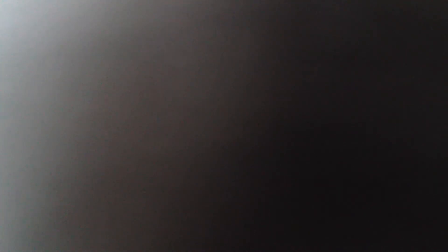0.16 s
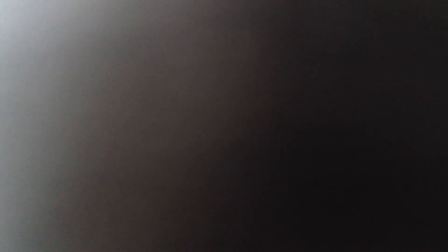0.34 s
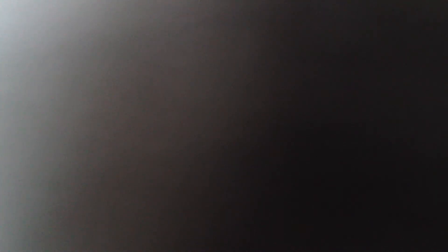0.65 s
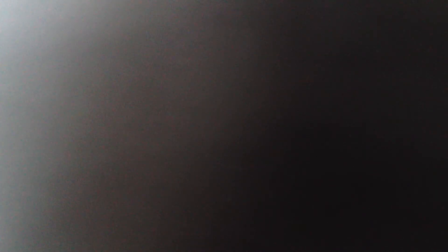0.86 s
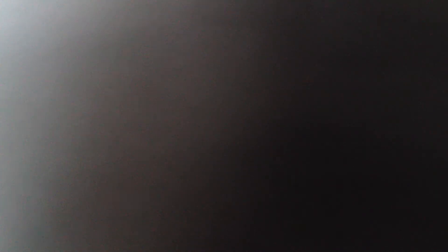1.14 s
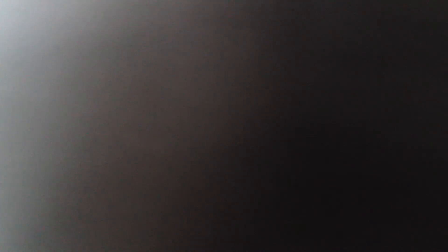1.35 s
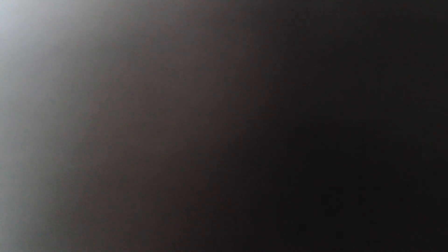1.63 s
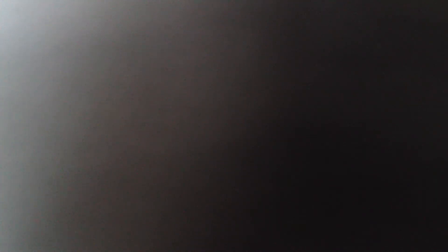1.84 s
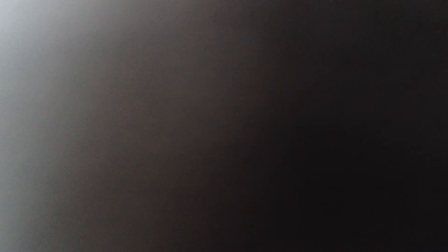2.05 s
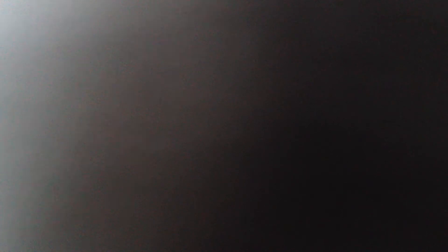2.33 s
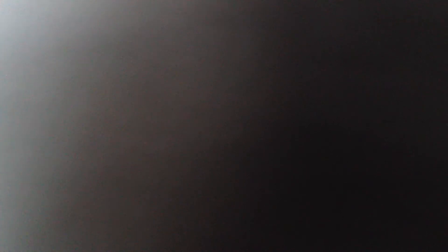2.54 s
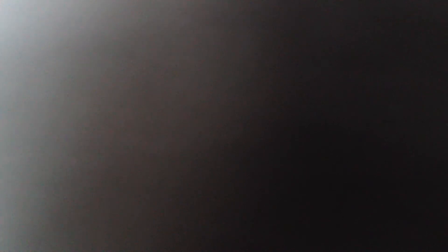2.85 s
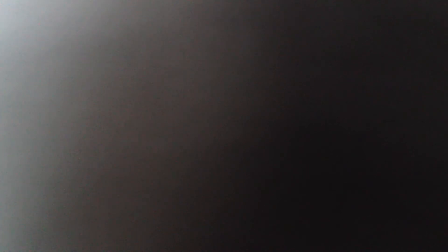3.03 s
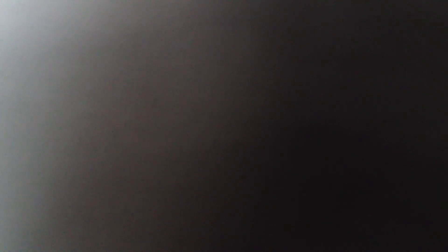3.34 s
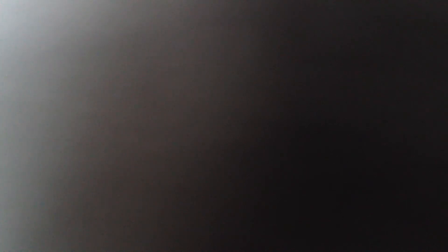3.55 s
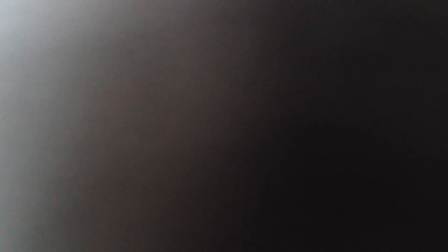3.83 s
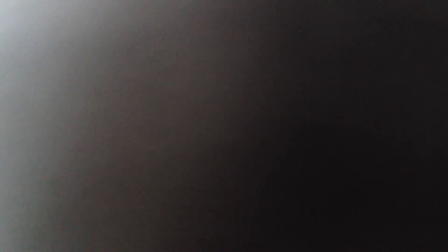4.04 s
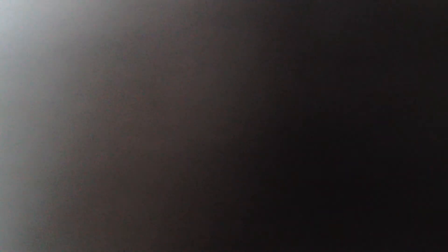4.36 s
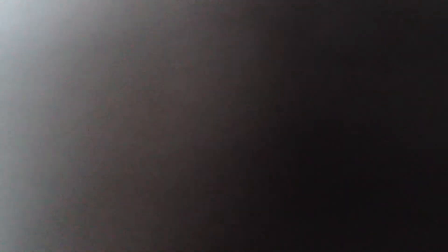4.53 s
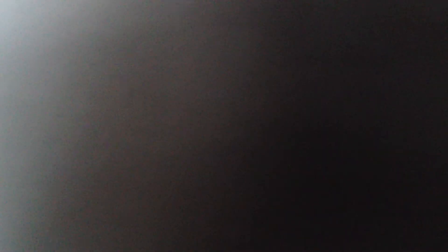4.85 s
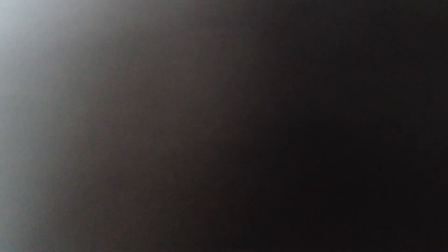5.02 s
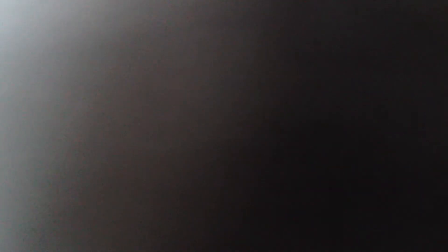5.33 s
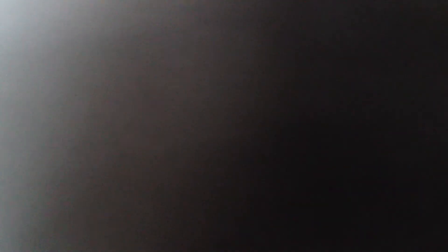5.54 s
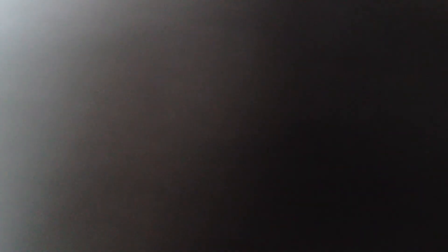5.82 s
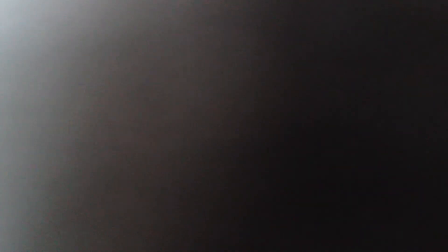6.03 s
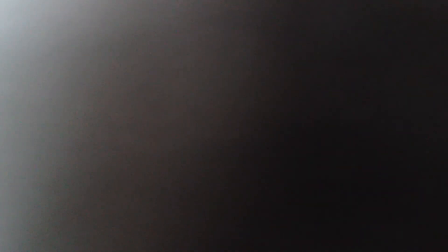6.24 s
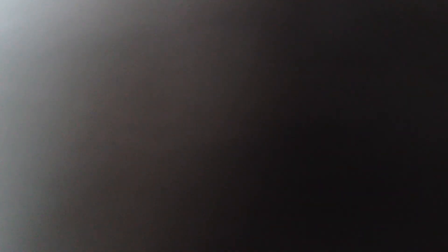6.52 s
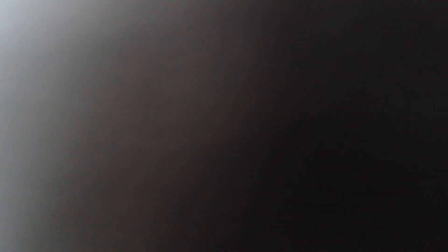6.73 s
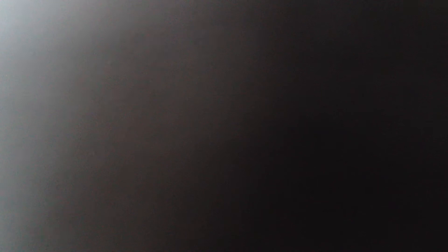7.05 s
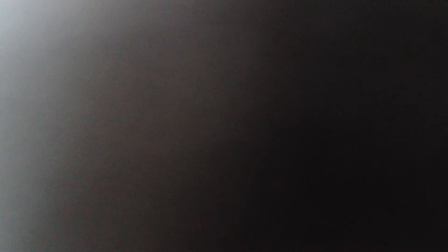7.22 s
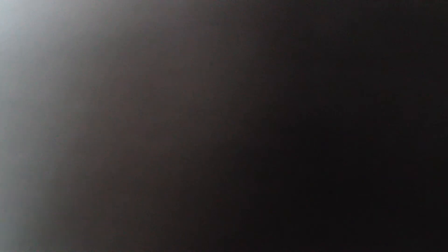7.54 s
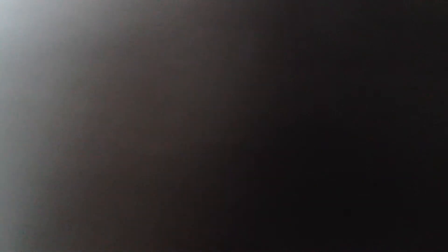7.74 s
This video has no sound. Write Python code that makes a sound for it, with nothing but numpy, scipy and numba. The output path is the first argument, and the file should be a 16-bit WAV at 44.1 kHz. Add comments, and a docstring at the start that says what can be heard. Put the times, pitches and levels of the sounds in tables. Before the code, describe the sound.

Hands rustle a stiff packing sheet very close to a small microphone in a quiet furnished room. Bursts of crinkling come with sharp crease snaps and dull bumps of a carton, building toward the middle and then thinning to scattered clicks. Near the end something hard knocks on the carton, followed by small creaks and softer crackles. Faint ventilation hum and a distant rumble lie underneath.

```python
"""Stiff packing sheet rustles in someone's hands, close to a small microphone in a quiet furnished room.
Thousands of tiny creases buckle in swarms, the carton thuds, big creases snap, folds creak.
Near the end something hard knocks on the carton; the gain control ducks and slowly recovers.
Ventilation hums underneath throughout, and a distant rumble comes through the walls."""
import sys
import numpy as np
from scipy import signal
from scipy.fft import rfft, irfft
from scipy.io import wavfile
from scipy.ndimage import uniform_filter1d
from numba import njit

SR = 44100
rng = np.random.default_rng(int(sys.argv[2]) if len(sys.argv) > 2 else 0)


def store_pcm(level_fs):
    """Save levels as 16-bit WAV."""
    pcm = np.round(np.clip(level_fs, -1, 1) * 32767).astype(np.int16)
    wavfile.write(sys.argv[1], SR, np.atleast_2d(pcm).T)


N = 347492
TIME = np.arange(N) / SR


def undb(db):
    return 10 ** (np.asarray(db) / 20)


def unit(x):
    return x / np.sqrt(np.mean(x ** 2))


def colour(x, spectrum):
    """Causal filter with the gain of (Hz, dB) points, built from the folded cepstrum."""
    hz, db = np.transpose(spectrum)
    grid = np.maximum(np.fft.rfftfreq(4096, 1 / SR), 1)
    cepstrum = irfft(np.interp(np.log(grid), np.log(hz), db) * np.log(10) / 20)
    cepstrum[1:2048] *= 2
    cepstrum[2049:] = 0
    return signal.fftconvolve(x, irfft(np.exp(rfft(cepstrum))))[:N]


def band(x, lo_hz, hi_hz):
    return signal.sosfilt(signal.butter(3, [lo_hz, hi_hz], "band", fs=SR, output="sos"), x)


@njit
def ring(count, at, hz, t60, size):
    """Sum of damped sines, each starting at its sample and running until 60 dB down."""
    y = np.zeros(count)
    for k in range(len(at)):
        pole = np.exp(2j * np.pi * hz[k] / SR - np.log(1000) / (t60[k] * SR))
        phasor = size[k] + 0j
        for i in range(at[k], min(count, at[k] + int(t60[k] * SR) + 2)):
            y[i] += phasor.imag
            phasor *= pole
    return y


def swell(at, hz, t60, size, rise):
    """Rings that build up over the share `rise` of their decay time."""
    hz, t60 = np.full(len(at), hz), np.full(len(at), t60)
    return ring(N, at, hz, t60, size) - ring(N, at, hz, rise * t60, size)


def walk(rate_hz):
    """Glides between random levels; spread near 1."""
    step = int(SR / rate_hz)
    return uniform_filter1d(np.repeat(rng.standard_normal(N // step + 1), step), step)[:N]


def crease_swarm(count, lo_hz, hi_hz, cycles, spread_db):
    """Tiny creases buckle at random: a few cycles each, mostly small, now and then large."""
    when, pitch, strength, side = rng.random((count, 4)).T
    hz = lo_hz * (hi_hz / lo_hz) ** pitch
    db = -spread_db * np.log(1 - .998 * strength)
    size = hz * undb(db) * np.sign(side - .5)  # size grows with pitch to keep the sum white
    return unit(ring(N, (when * N).astype(np.int64), hz, cycles / hz, size))


# Slow background of the handling: t/s, crackle level/dB, top treble re crackle/dB, carton rumble/dB
HANDLING_BED = [(0, -66, -5.5, -65), (.3, -71, -4.5, -90), (2.6, -62, -5, -65), (3.4, -65, -5.5, -59),
                (4.2, -72, -5.5, -54.5), (4.55, -80, -1, -58.5), (4.76, -58.5, -3.5, -62.5),
                (5.08, -56.5, -3, -58), (5.15, -79, -4.5, -56), (5.8, -66, -4, -61.5), (6.09, -65, -7, -54),
                (6.4, -71, -8, -59.5), (6.82, -74.5, -5, -59.5), (6.97, -61, -7, -62), (7.12, -61, -5, -60),
                (7.27, -78, -12, -57), (7.5, -71, -7, -59), (7.6, -62.5, -4, -60.5), (7.88, -64, -1, -54)]
# Swells of sheet crackle, from hand strokes and from the sheet shaken by the knock:
# t/s, hold/ms, level/dB, 10 dB rise before/ms, 10 dB fall after/ms
CRACKLE_SWELLS = [(0.0, 97, -52, 130.0, 4.0), (0.103, 81, -46, 11, 15), (0.186, 53, -41, 10, 27),
                  (0.317, 167, -52, 71.0, 116), (0.608, 88, -45.5, 8, 4), (0.651, 0.0, -52.5, 4.0, 175.0),
                  (0.845, 32.0, -44.5, 4, 23), (0.913, 22, -43.5, 33.0, 81), (1.041, 130, -48.5, 2, 190.0),
                  (1.155, 68, -47, 164, 58), (1.283, 74.0, -50.5, 31, 19.0), (1.433, 30, -41.5, 22, 41),
                  (1.668, 80, -48, 70, 15.0), (1.791, 31, -44, 25, 57), (1.857, 15, -46, 12.0, 17),
                  (1.959, 48.0, -40, 10, 157), (2.063, 158.0, -45.5, 3, 11), (2.201, 111.0, -45.5, 7, 88.0),
                  (2.44, 19, -45.5, 51.0, 14), (2.519, 25, -38.5, 38, 35), (2.691, 86, -45.5, 3, 8),
                  (2.805, 91, -40.5, 71, 44), (3.026, 25, -36, 35, 48), (3.171, 4, -43, 34, 71),
                  (3.321, 8, -39, 34, 30), (3.439, 105, -44, 17.0, 28.0), (3.576, 97, -37, 40.0, 9.0),
                  (3.663, 42, -33.0, 17.0, 30), (3.841, 30.5, -27.5, 30.5, 17),
                  (3.907, 87.0, -47, 13.0, 75.0), (4.005, 38.0, -42, 22, 20), (4.051, 225, -47, 7, 27.0),
                  (4.322, 34, -39.5, 38, 74.0), (4.398, 70.0, -50.5, 69.0, 24), (4.589, -5, -45, 13, 37),
                  (4.655, 50, -55, 4, 36.0), (5.158, 1.0, -55.5, 145.0, 130), (5.295, 0.0, -56, 11.0, 105),
                  (5.645, 166.0, -51, 94, 87.0), (6.09, 15, -64, 28, 30.0), (6.27, 13, -60.0, 28, 33),
                  (6.46, 7, -62.5, 30.0, 35), (6.585, 5.0, -63.0, 8, 20.0), (6.87, 14, -40.5, 3, 33),
                  (7.204, -3, -47, 45.0, 27), (7.295, 0.5, -56.5, 10.0, 70),
                  (7.437, 77.0, -61.5, 12.0, 34.0), (7.81, 1, -59, 42, 48)]


def crackle_db():
    """Stroked or shaken, the sheet's crackle swells, holds and dies away over a faint background."""
    t = np.arange(0, N + 64, 64) / SR
    times, rest_db, _, _ = np.transpose(HANDLING_BED)
    power = undb(2 * np.interp(t, times, rest_db))
    for start, hold_ms, db, rise_ms, fall_ms in CRACKLE_SWELLS:
        ms = 1000 * (t - start)
        drop_db = 10 * np.maximum(-ms / rise_ms, (ms - hold_ms) / fall_ms).clip(min=0)
        power += undb(2 * (db - drop_db))
    return np.interp(TIME, t, 10 * np.log10(power))


# Colour of the sheet, close up through the microphone port: f/Hz, level/dB
SHEET_COLOUR = [(47, -71), (80, -4.5), (180, -4.5), (500, -7), (750, -7), (1000, -4.5), (1770, -6),
                (3000, -2.5), (3800, 0), (4450, -8.5), (6300, -2.5), (7600, -8.5), (9700, -19.5),
                (15200, -16)]


def rustle():
    """Close to the microphone, the moving sheet gives crease swarms, sliding hiss and low carton flex."""
    times, _, top_db, rumble_db = np.transpose(HANDLING_BED)
    top_gain = undb(np.interp(TIME, times, top_db))
    rumble_gain = undb(np.interp(TIME, times, rumble_db))
    motion = undb(crackle_db())
    slide = 1.18 * rng.standard_normal(N)
    creases = crease_swarm(count=50000, lo_hz=714, hi_hz=17300, cycles=10.3, spread_db=2.5)
    sheet = colour(creases + slide, SHEET_COLOUR)
    bright = unit(band(sheet, 1024, 10130)) + top_gain * unit(band(sheet, 8440, 16900))
    flex = crease_swarm(count=12000, lo_hz=88, hi_hz=1144, cycles=6.4, spread_db=3.0)
    flex = unit(band(colour(flex, SHEET_COLOUR), 81, 1200))
    flex_gain = np.hypot(undb(-10.5) * motion, rumble_gain)  # the carton follows each swell
    quick_slips = undb(1.3 * walk(70) + 1.4 * walk(250))
    return quick_slips * (motion * bright + flex_gain * flex)


# Ventilation hum filling the room: f/Hz, relative level/dB
ROOM_COLOUR = [(25, -33), (70, -20), (118, -9.5), (190, -6.5), (300, -6.5), (400, -21.5), (608, -14.5),
               (700, -10.5), (1000, -9), (1500, -8), (2200, -19), (3800, -27.5), (4500, -41), (9900, -36),
               (15200, -39)]
# Narrow bands of the ventilation duct: f/Hz, width/Hz, level/dB
DUCT_BANDS = [(990, 114, -62.5), (1220, 102, -66), (715, 90, -68.5)]
# Distant rumble, heard through the walls: t/s, level/dB
WALL_RUMBLE = [(0.0, -80), (2.06, -82), (2.79, -66), (3.82, -61), (3.91, -69), (4.21, -59), (4.37, -56),
               (5.11, -65.5), (6.76, -63), (6.96, -67), (7.53, -63.5), (7.88, -64)]


def room_tone():
    """Steady ventilation with a few duct bands, and a far rumble that comes and goes."""
    air = unit(colour(rng.standard_normal(N), ROOM_COLOUR))
    air *= undb(-57.5 + 0.69 * walk(3.2) + 0.87 * walk(24))
    duct = sum(undb(db) * unit(band(rng.standard_normal(N), hz - width / 2, hz + width / 2))
               for hz, width, db in DUCT_BANDS)
    times, rumble_db = np.transpose(WALL_RUMBLE)
    rumble = unit(band(rng.standard_normal(N), 92.5, 204)) * undb(np.interp(TIME, times, rumble_db))
    return air + duct + rumble


# Dull carton thuds close by, from handling or under the biggest crease snaps: t/s, level/dB, f/Hz, t60/s
CARTON_THUDS = [(0.075, -47, 275, 0.052), (0.099, -45, 296, 0.04), (0.187, -32.5, 885, 0.022),
                (0.233, -48, 288, 0.049), (0.671, -42, 1000, 0.032), (1.166, -50, 256, 0.052),
                (1.473, -24.5, 1030, 0.01), (1.951, -46.5, 570, 0.035), (2.756, -37, 194, 0.023),
                (3.013, -39.5, 518, 0.18), (3.313, -34.5, 1084, 0.04), (3.667, -32.5, 541, 0.15),
                (3.826, -30, 450, 0.13), (4.008, -43, 195, 0.04), (4.582, -43, 625, 0.066),
                (4.804, -41.5, 209, 0.091), (5.16, -43.5, 310, 0.036), (6.091, -41, 307, 0.054),
                (6.262, -43, 430, 0.042), (6.449, -48, 533, 0.14), (6.579, -44, 384, 0.056),
                (7.152, -37, 590, 0.037), (7.162, -28.5, 428, 0.057), (7.793, -40, 234, 0.054)]


def carton_thuds():
    """The carton is jolted: a dull, uneven ring with one partial above its pitch and one below."""
    times, db, hz, t60 = np.transpose(CARTON_THUDS)
    at, size = (times * SR).astype(np.int64), undb(db)
    main = ring(N, at, hz, t60, size)
    upper = ring(N, at, 1.5 * hz, t60, 0.25 * size)
    lower = ring(N, at, 0.56 * hz, 0.5 * t60, 0.63 * size)
    return band((main + upper + lower) * (1 + 0.55 * walk(300)), 90, 1700)


def stray_snaps(count):
    """Extra rows for CREASE_SNAPS: small snaps at random moments, stronger when the crackle is loud."""
    when, strength, pitch, sparkle = rng.random((count, 4)).T
    above_crackle_db = 11 - 3 * np.log(1 - .97 * strength)
    db = crackle_db()[(when * N).astype(int)] + above_crackle_db
    spark_db = db - 23 + 12 * (sparkle - .5)
    return np.c_[when * N / SR, db, 2000 * 3 ** pitch, spark_db]


# Single creases right at the microphone: t/s, crack level/dB, f/Hz, spark level/dB
CREASE_SNAPS = [(0.1026, -24, 4030, -50), (0.1068, -20, 3860, -40), (0.1239, -27, 3640, -52),
                (0.1607, -14, 4120, -35), (0.165, -20, 3740, -45), (0.1691, -13, 3930, -41.5),
                (0.174, -16, 4810, -44), (0.1885, -0.5, 3500, -43), (0.192, -29, 3090, -41),
                (0.2337, -21, 5440, -49), (0.4347, -27, 3300, -53), (0.4506, -23, 3420, -53),
                (0.4641, -19.5, 4400, -36), (0.47, -24, 3550, -52), (0.584, -21, 3560, -36),
                (0.6137, -26, 4830, -49), (0.6734, -20.5, 2280, -47), (0.7353, -33, 4180, -55),
                (0.8111, -40, 5360, -50), (0.8425, -36, 3500, -56), (1.2416, -26, 2400, -53),
                (1.4196, -21, 3380, -51), (1.473, -6, 3740, -34), (1.4762, -15, 1650, -34),
                (1.7977, -32, 5550, -36), (1.9534, -32, 3500, -49), (1.9749, -20, 3240, -40),
                (2.092, -18.5, 3000, -48), (2.157, -29, 1600, -52), (2.2022, -27, 4460, -46),
                (2.277, -28, 3000, -48), (2.3133, -22, 3300, -48), (2.4489, -2, 4740, -28),
                (2.5097, -20, 3500, -40), (2.5221, -17, 3500, -36), (2.7655, -13.5, 3170, -46),
                (3.1711, -24, 5620, -39), (3.3164, -15, 2900, -41), (3.4328, -33, 2740, -44),
                (3.752, -39, 5700, -27.5), (3.7895, -18, 3000, -50), (3.808, -18, 5870, -55),
                (3.8264, -7.5, 3160, -39), (3.8425, -10, 3280, -37), (3.998, -28, 2500, -50),
                (4.012, -22, 2860, -41), (4.0162, -18, 2180, -45), (4.1557, -28.5, 2500, -43),
                (4.307, -22.5, 6310, -37), (4.4878, -28, 4780, -45), (4.5817, -33, 2670, -36),
                (4.603, -39, 4470, -36), (4.6551, -50, 1980, -37), (4.6644, -31.5, 4910, -36),
                (4.6672, -27.5, 2200, -34), (4.7013, -37, 5860, -47), (4.7178, -28, 4940, -36),
                (5.1612, -25, 6500, -31), (5.197, -46, 6000, -55), (5.2185, -34, 6500, -44),
                (5.2579, -33, 5250, -48), (5.2933, -27.5, 5900, -37), (5.3043, -42, 5500, -52),
                (6.0011, -32, 1600, -58), (6.1505, -36, 3820, -58), (6.7094, -39, 3770, -68),
                (7.0084, -35, 3130, -52), (7.0863, -32, 3650, -53), (7.111, -37, 3700, -51),
                (7.2517, -28, 3140, -43), (7.288, -34, 2420, -70), (7.2995, -26, 3610, -49),
                (7.4369, -40, 2980, -73), (7.4691, -29, 2410, -73), (7.5016, -30, 3200, -73),
                (7.7011, -54, 3000, -46), (7.7114, -47, 3130, -32), (7.74, -36, 5190, -45),
                (7.801, -34, 3000, -59)]
PORT_HZ, SPARK_HZ = 5930, 12650
CHATTER_DB, CHATTER_T60_S = -18.5, 0.021


def crease_snaps():
    """A crease gives way: a crack that rings the microphone port, a spark on top, then sheet chatter."""
    times, db, hz, spark_db = np.r_[CREASE_SNAPS, stray_snaps(count=300)].T
    at, size = (times * SR).astype(np.int64), undb(db)
    crease = swell(at, hz, t60=4.6 / hz, size=1.69 * size, rise=0.36)
    port = swell(at, PORT_HZ, t60=0.0013, size=0.6 * size, rise=0.27)
    crack = band(band(crease + port, 1170, 8900), 1217, 9300)
    spark = swell(at, SPARK_HZ, t60=0.0012, size=2.9 * undb(spark_db), rise=0.17)
    kicks = np.zeros(N)
    np.add.at(kicks, at, size)
    fade = np.exp(-np.log(1000) * TIME[:SR // 10] / CHATTER_T60_S)
    chatter_gain = undb(CHATTER_DB) * signal.fftconvolve(kicks, fade)[:N]
    chatter = crease_swarm(count=30000, lo_hz=1250, hi_hz=8800, cycles=3.9, spread_db=1.5)
    chatter = unit(band(colour(chatter, SHEET_COLOUR), 1300, 9700))
    return crack + band(spark, 8700, 16500) + chatter_gain * chatter


# Slips of a settling fold, close by: t/s, level/dB, favoured f/Hz
FOLD_SLIPS = [(0.407, -41.5, 2000), (0.582, -41, 3510), (1.443, -35, 3770), (1.4505, -31, 3750),
              (7.197, -31, 2250), (7.21, -41, 3000), (7.287, -46, 1970), (7.299, -44, 3820),
              (7.328, -46, 3030), (7.374, -47, 3030), (7.435, -43.5, 2580), (7.468, -43.5, 3020)]
# Modes of the fold: f/Hz, level/dB, t60/s
FOLD_MODES = [(1960, 1.5, 0.03), (2570, -9.5, 0.039), (3050, -1.5, 0.045), (3480, -3, .025),
              (3770, 0.5, .03), (4690, -2, 0.02), (6000, -6, .02)]
FOLD_DB_PER_OCT = 24  # modes away from the favoured pitch are weaker


def fold_creaks():
    """A fold slips over a few ms: its modes swell and fade, chopped and smeared by the uneven slip."""
    times, db, favoured_hz = np.transpose(FOLD_SLIPS)
    at = (times * SR).astype(np.int64)
    tones = np.zeros(N)
    for hz, mode_db, t60 in FOLD_MODES:
        loss_db = FOLD_DB_PER_OCT * abs(np.log2(hz / favoured_hz))
        tones += swell(at, hz, t60, size=2.22 * undb(db + mode_db - loss_db), rise=0.36)
    uneven_slip = 1 + 0.57 * walk(400) + .15 * walk(5000)
    return band(tones * uneven_slip, 1000, 7400)


# Hard blows within the one close knock: t/s, level/dB, contact/ms
KNOCK_BLOWS = [(6.8639, -9.5, .12), (6.8660, -7.5, 0.89), (6.868, -13, 0.15), (6.8751, -3, 0.054),
               (6.878, -13, 0.8), (6.885, -18, 0.18), (6.895, -28, 0.29), (6.901, -30, 0.14)]
# Modes of the carton: f/Hz, level/dB, t60/s
CARTON_MODES = [(273, -4, 0.021), (436, -12.5, 0.032), (556, -14, 0.019), (758, -7, 0.038),
                (923, -6.5, 0.038), (1090, -9, 0.053), (1243, -14, 0.037), (1425, -13, 0.034),
                (1643, -7.5, 0.037), (2470, -13, 0.02), (2960, -14, 0.021), (3364, -7.5, 0.016),
                (5000, -14, 0.014), (5710, -17, 0.019)]


def carton_knock():
    """Something hard lands on the carton and bounces; shorter contact reaches higher modes."""
    start, length = KNOCK_BLOWS[0][0], SR // 5
    force = np.zeros(SR // 10)
    for t, db, contact_ms in KNOCK_BLOWS:
        pulse = np.hanning(int(contact_ms * SR / 1000) + 3)[1:-1]
        at = int((t - start) * SR)
        force[at:at + len(pulse)] += undb(db) * pulse / pulse.sum()
    hz, db, t60 = np.transpose(CARTON_MODES)
    signs = (-1.) ** np.arange(len(hz))  # neighbouring modes move the near panel in opposite directions
    modes = ring(length, np.zeros(len(hz), np.int64), hz, t60, undb(db) * signs)
    rattle = unit(colour(rng.standard_normal(length), SHEET_COLOUR)[:length])
    rattle *= undb(-7) * np.exp(-TIME[:length] / 0.0035)
    hit = signal.fftconvolve(force, modes + rattle)
    onset = int(start * SR)
    return np.pad(hit, (onset, N - onset - len(hit)))


def room_echo(close, level_db=-39, t60_s=0.41):
    """Walls and furniture return a short, faint wash to the microphone."""
    t = TIME[:SR // 3]
    decay = np.exp(-np.log(1000) * t / t60_s) * (t > .004)
    wash = band(rng.standard_normal(len(t)), 200, 10000) * decay
    return undb(level_db) * signal.fftconvolve(close, wash / np.sqrt(np.sum(wash ** 2)))[:N]


def scene():
    """One microphone close to sheet and carton, with the room tone behind them."""
    close = rustle() + carton_thuds() + crease_snaps() + fold_creaks() + carton_knock()
    # the small port passes little bass from close sources
    bass_cut = signal.butter(4, 157, "high", fs=SR, output="sos")
    close = signal.sosfilt(bass_cut, close + room_echo(close))
    return (close + room_tone())[None]


@njit
def peak_envelope(x, attack, release):
    """Follows the peaks; attack and release are the shares of the gap closed per sample."""
    level, y = 0., np.empty(len(x))
    for i in range(len(x)):
        level += (abs(x[i]) - level) * (attack if abs(x[i]) > level else release)
        y[i] = level
    return y


DUCK_THRESHOLD_DB, DUCK_RATIO, DUCK_RELEASE_S = -15.5, 2.7, 1


def record(dry):
    """The recorder's gain control turns loud hits down and recovers slowly; the top treble is cut."""
    level = peak_envelope(dry[0], attack=0.01, release=1 / (DUCK_RELEASE_S * SR))
    gain = np.minimum(undb(DUCK_THRESHOLD_DB) / (level + 1e-9), 1) ** (1 - 1 / DUCK_RATIO)
    treble_cut = signal.ellip(10, .2, 55, 15300, fs=SR, output="sos")
    return signal.sosfilt(treble_cut, dry * gain)


dry = scene()
out = record(dry)
store_pcm(out)
```